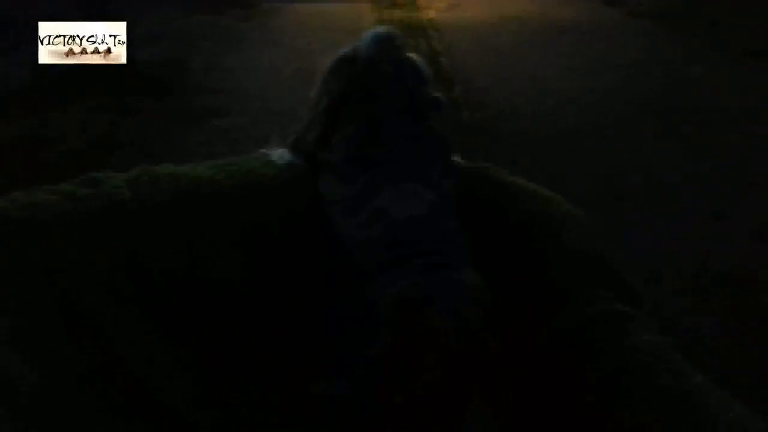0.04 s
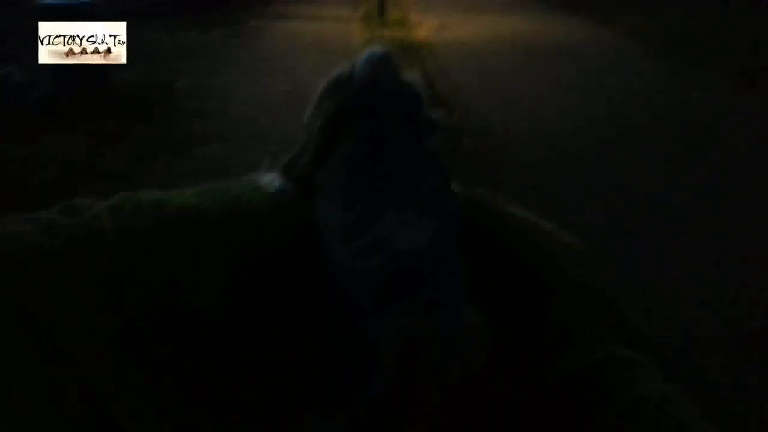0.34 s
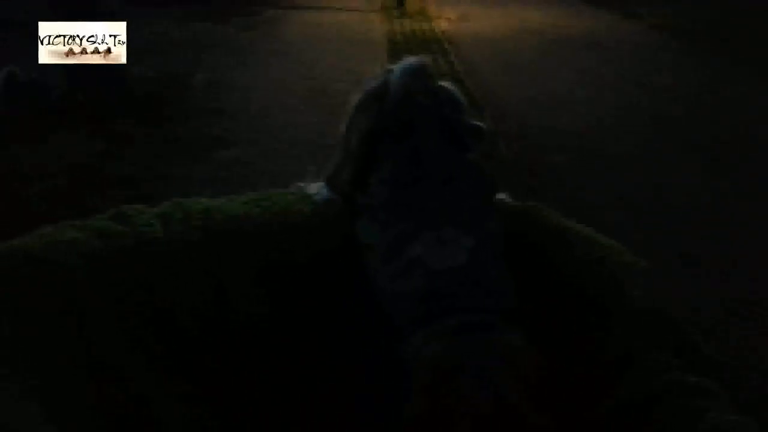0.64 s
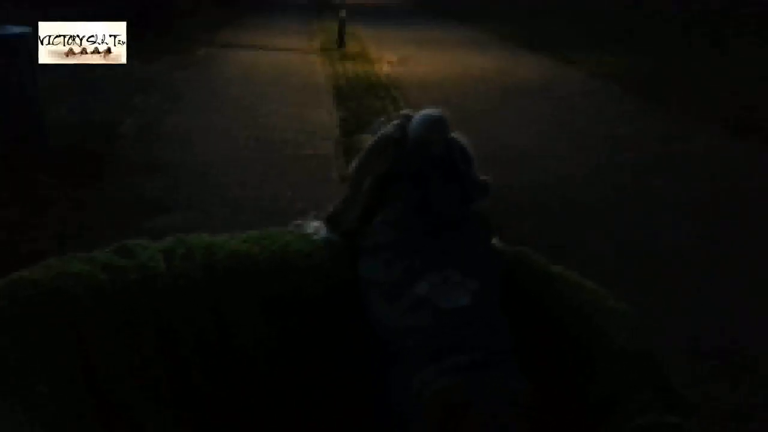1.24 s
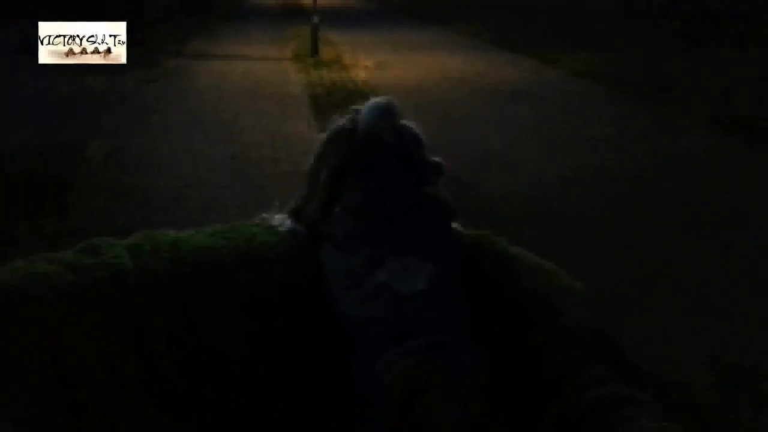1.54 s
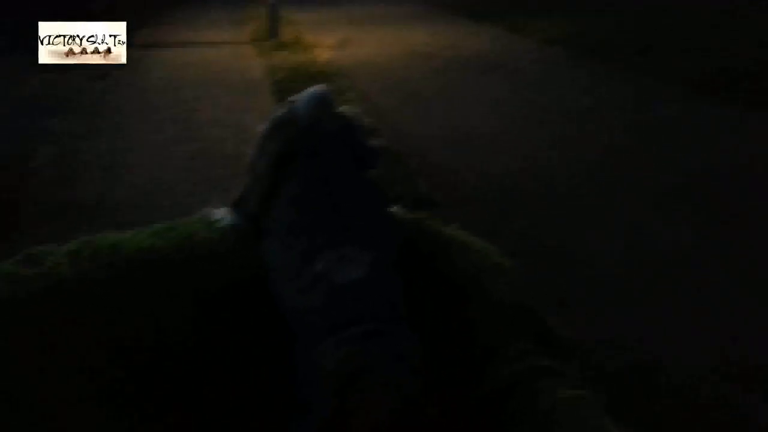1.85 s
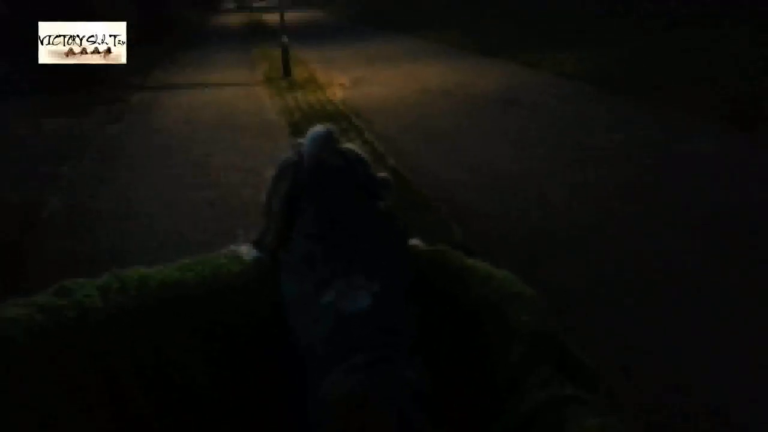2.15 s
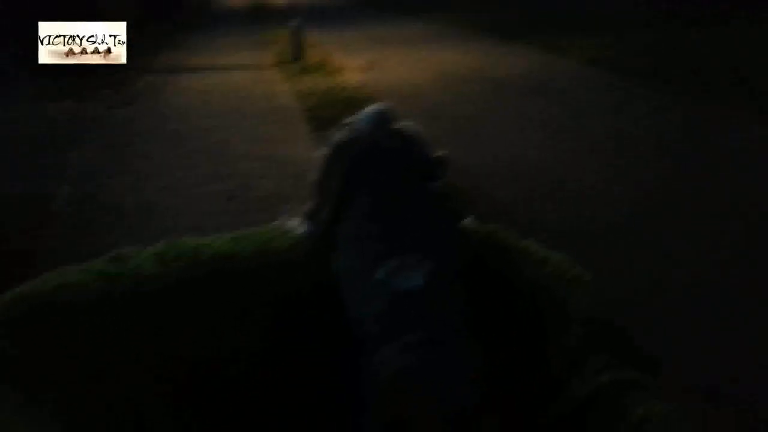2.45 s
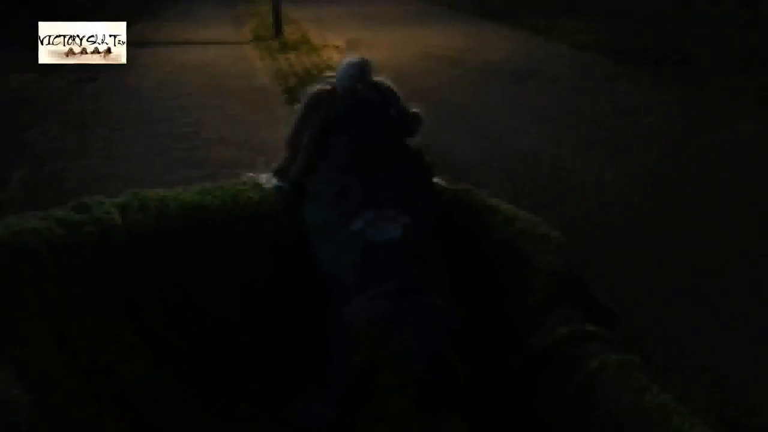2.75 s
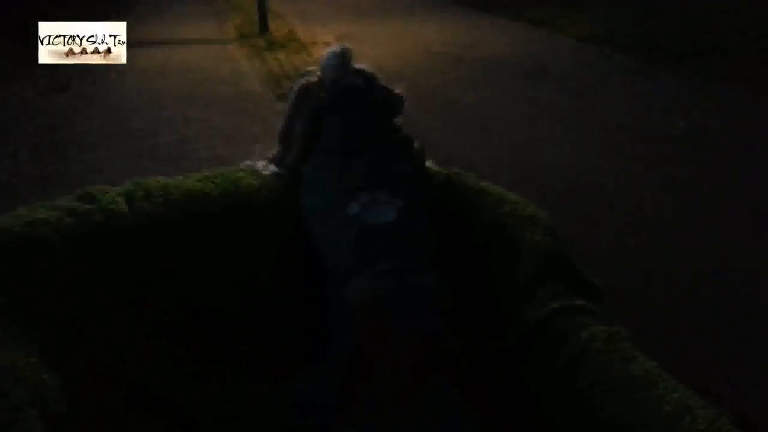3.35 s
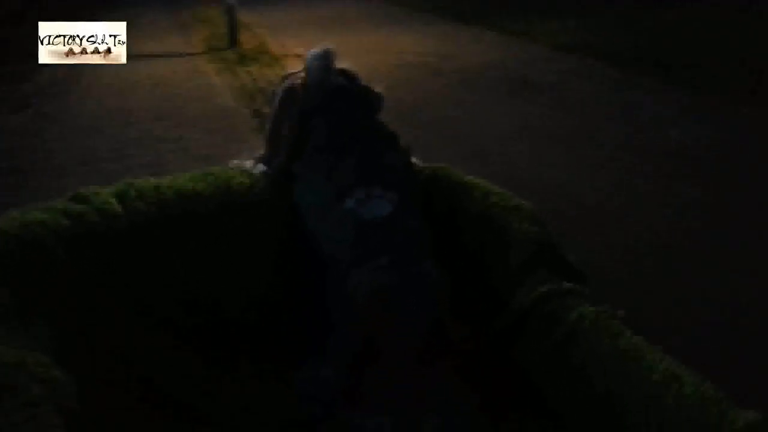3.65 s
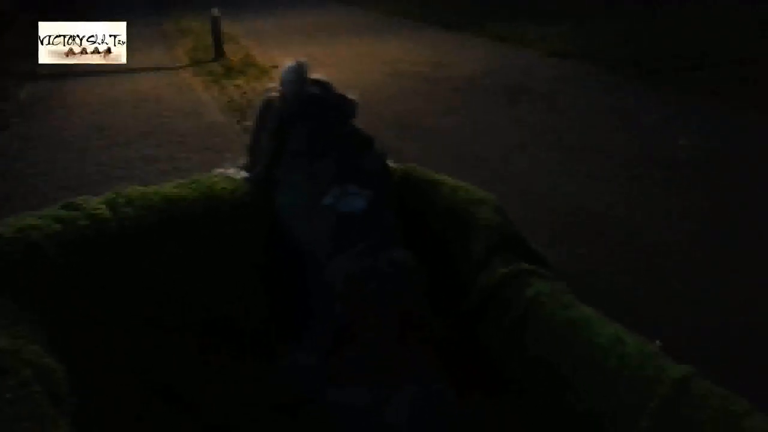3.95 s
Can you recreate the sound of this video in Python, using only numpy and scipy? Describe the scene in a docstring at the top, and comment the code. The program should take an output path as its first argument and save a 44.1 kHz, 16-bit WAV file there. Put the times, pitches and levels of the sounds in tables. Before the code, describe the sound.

A pram wheel chatters unevenly as the tyres rumble over a gritty paved path.

```python
"""A paved path at night, heard from the handle of a pram being pushed along it.
A wheel on the left catches and slips: quick, uneven resonant ticks that swell and stall, with short
reflections from hood, frame and ground. The tyres rumble, hiss over grit and scuff once; grit snaps.
Bumps thump through the chassis and clack its joints; two lone wheel ticks and one frame tap sound dry.
Brushing fabric swishes, its crisp top slightly to the right."""
import sys
import numpy as np
from scipy import signal
from scipy.fft import rfft, irfft, next_fast_len
from scipy.io import wavfile
from scipy.ndimage import map_coordinates

SR = 44100
rng = np.random.default_rng(int(sys.argv[2]) if len(sys.argv) > 2 else 0)


def dump(signal):
    """Clip the signal to [-1, 1] and save it as 16-bit WAV at the path in sys.argv[1]."""
    limited = np.clip(np.atleast_2d(signal).T, -1, 1)
    pcm = np.round(limited * 32767).astype(np.int16)
    wavfile.write(sys.argv[1], SR, pcm)


N = 176400

# tyres on the path: time_s, relative_db
RUMBLE_DB = [(0.0, -52.5), (0.23, -53.5), (0.49, -54.5), (0.72, -52), (1.34, -52.5), (1.69, -52.5),
             (1.95, -53), (2.17, -54.5), (2.41, -50), (2.61, -53), (2.82, -53), (2.95, -52), (3.6, -53),
             (4.0, -51.5)]
GRIT_DB = [(0.0, -51), (0.01, -42), (0.27, -42.5), (0.33, -38.5), (0.7, -44), (1.46, -43), (1.77, -38),
           (1.89, -46), (2.24, -37), (2.7, -41.5), (2.99, -39), (3.03, -43), (3.12, -40.5), (3.2, -44),
           (3.31, -41), (4.0, -40.5)]
# fabric swish and its crisp top: time_s, relative_db
SWISH_DB = [(0, -55), (.08, -53), (.17, -60.5), (.36, -50.5), (.5, -49.5), (.58, -58.5), (.66, -47.5),
            (.76, -61.5), (1.25, -57.5), (1.45, -55), (1.56, -59.5), (1.8, -56.5), (1.92, -60.5),
            (2.2, -64.5), (2.37, -57.5), (2.6, -59), (2.75, -51.5), (2.9, -60), (3.0, -58), (3.2, -57.5),
            (3.33, -49.5), (3.52, -65), (3.65, -59.5), (3.78, -60.5), (3.94, -51), (4, -50)]
FIZZ_DB = [(0.0, -56.5), (0.15, -63.5), (0.38, -52.5), (0.56, -66), (0.66, -60), (0.76, -62), (2.57, -60),
           (2.62, -65), (2.74, -54.5), (2.92, -63), (2.99, -55.5), (3.14, -62), (3.33, -53.5),
           (3.46, -60.5), (3.83, -60.5), (4.0, -53)]
# spectral shapes: freq_hz, gain_db
RUMBLE_EQ = [(20, -10), (42, -9), (75, -8), (115, -1), (165, 1), (280, 2), (480, 0.5), (750, 0), (1200, 0),
             (3000, -59)]
GRIT_EQ = [(60, -26), (200, -6), (650, -6), (950, -0.5), (1270, 5), (1600, -1), (2800, -1), (4200, -4),
           (6000, -13), (15000, -50)]
SCUFF_EQ = [(80, -41), (400, -4), (700, 4), (1100, -4), (2500, -7), (8000, -35)]
SWISH_EQ = [(200, -38), (1000, 14), (3000, 9.5), (5000, 9), (7500, 5.5), (9000, -2), (14500, -9.5)]
FIZZ_EQ = [(5000, -23), (8500, 11.5), (10500, 11.5), (14000, 10), (15000, -14)]
CHASSIS_EQ = [(30, -28), (80, -5), (150, -1.5), (1000, -1), (3000, 6), (6000, -10)]

# grit under a tyre: start_s, relative_db
GRIT_SNAPS = [(.188, -45), (0.65, -42), (.671, -45), (.935, -41), (0.95, -45), (1.634, -46), (2.294, -44),
              (2.929, -47), (3.603, -43), (3.661, -43.5)]
# thumps, before CHASSIS_EQ: start_s, level_db, t60_s, centre_hz
CHASSIS_BUMPS = [(0.476, -34, 0.055, 232), (0.526, -42, 0.14, 260), (0.613, -35, 0.12, 245),
                 (0.656, -39, 0.069, 215), (0.71, -42.5, 0.11, 190), (.74, -33, 0.072, 330),
                 (0.943, -45.5, 0.38, 210.4), (1.03, -42.5, 0.13, 188), (1.298, -33.5, 0.064, 320.2),
                 (1.395, -44, 0.26, 307), (1.75, -40.5, 0.098, 350.5), (1.845, -36, 0.09, 212),
                 (2.335, -40, 0.19, 400), (2.385, -38.5, 0.11, 267), (2.468, -39, 0.24, 252.2)]
# joint impacts: start_s, relative_db, t60_s, centre_hz, crack_db
JOINT_CLACKS = [(0.475, -28, 0.02, 3180, -34), (0.486, -28, 0.019, 3150, -35),
                (.521, -31, 0.0092, 3400, -22), (0.5276, -22.5, 0.013, 3260, -26),
                (0.572, -27.5, 0.023, 3340, -22), (0.6062, -24, 0.087, 3245, -16.5),
                (0.738, -34.5, 0.045, 3160, -44), (1.299, -32.5, 0.039, 3330, -42)]
# joint resonances: ratio_to_centre, gain_db
JOINT_MODES = [(.99, -5), (1.071, 5.5)]
# two wheel ticks, then a frame tap, before panning: time_s, low_hz, low_peak_db, high_hz, high_peak_db
SINGLE_TICKS = [(.704, 2400, -30, 4050, -26.5), (.785, 2330, -31, 3900, -42),
                (2.2282, 944, -25, 4407, -23.5)]
# their bandwidths: low_width_hz, high_width_hz
SINGLE_WIDTHS_HZ = (390, 1000)

# wheel slip rate: time_s, ticks_per_s
TICK_RATE_HZ = [(0, 113), (.17, 134), (.22, 82), (.34, 123), (.45, 115), (.52, 85), (.65, 110), (.72, 62),
                (.82, 121), (.88, 121), (1.12, 131), (1.19, 91), (1.3, 139), (1.5, 122), (1.66, 138),
                (1.84, 102), (2.0, 153), (2.15, 111), (2.34, 102), (2.42, 132), (2.56, 110), (2.75, 145),
                (2.92, 106), (2.99, 76), (3.1, 137), (3.2, 94.4), (3.35, 117), (3.6, 123), (3.73, 103),
                (4, 132)]
# chatter strength: time_s, relative_db
CHATTER_DB = [(0, -48.5), (.18, -47), (.205, -53.5), (.27, -47.5), (.36, -46), (.5, -40.5), (.59, -41),
              (.66, -42), (.71, -45), (.785, -50), (.81, -40.5), (.865, -39.5), (.935, -42), (.95, -53),
              (.995, -54), (1.025, -40.5), (1.1, -41), (1.16, -37.5), (1.29, -39.5), (1.33, -44.5),
              (1.41, -42), (1.47, -48), (1.57, -45.5), (1.8, -44), (1.855, -43), (1.88, -58), (1.92, -50.5),
              (1.96, -40.5), (2.01, -41), (2.06, -48.5), (2.13, -49), (2.23, -43), (2.26, -38.5),
              (2.35, -44), (2.42, -40.5), (2.475, -44), (2.52, -39), (2.665, -37.5), (2.74, -42.5),
              (2.83, -42), (2.95, -43.5), (3.01, -47), (3.05, -61), (3.08, -41.5), (3.11, -42), (3.17, -46),
              (3.2, -54), (3.26, -46), (3.36, -46), (3.42, -48.5), (3.5, -44), (3.64, -44.5), (3.71, -47),
              (3.82, -44.5), (4, -43)]
# weaker slips between ticks: time_s, db_re_ticks
STRAY_SLIP_DB = [(0, -4), (.35, -12), (.6, -18), (1.22, -19), (1.4, -8), (2.3, -8), (2.55, -17),
                 (2.68, -16), (2.8, -9), (3.35, -5), (4, -12)]
# tick resonances: time_s, centre_hz
MAIN_RING_HZ = [(0, 2280), (.45, 2560), (.75, 2300), (1.05, 2600), (1.12, 2900), (1.28, 2500), (1.38, 2180),
                (1.95, 2320), (2.5, 2780), (2.66, 2450), (2.85, 2300), (2.95, 2550), (3.1, 2480),
                (3.45, 2950), (4, 3150)]
HIGH_RING_HZ = [(0, 3920), (.5, 4260), (.88, 4100), (1.22, 4430), (1.45, 3830), (3.55, 3908), (4, 4462)]
# main resonance bandwidth: time_s, width_hz
MAIN_WIDTH_HZ = [(.8, 800), (1.08, 1100), (1.27, 680), (2.47, 850), (2.65, 740), (2.8, 900), (3.2, 850),
                 (3.5, 580), (4, 680)]
# secondary tick resonances: time_s, db_re_main
LOW_RING_DB = [(0, -9.5), (.9, -17), (1.3, -17), (1.6, -6), (1.9, -10.5), (2.1, -6.5), (2.64, -14),
               (2.92, -3.5), (3.3, -11), (3.62, -4), (4, -11.5)]
MID_RING_DB = [(3.1, -30), (3.33, -4), (3.48, -9), (3.77, -2.5)]
HIGH_RING_DB = [(0, 0), (.15, -2.5), (.27, 3.5), (.55, -5), (.78, -5), (.87, -1), (.94, 0.5), (1.1, -7),
                (1.24, -10), (1.5, 4), (1.65, 0), (1.92, -6.5), (2.17, -3.5), (2.42, -12.5), (2.62, -8.5),
                (2.9, -5), (3.13, -0.5), (3.5, -5.5), (4, -7)]


def amp(db):
    """Decibels to gain."""
    return 10 ** (np.asarray(db) / 20)


def ears(left_db, right_db):
    """Stereo gain column."""
    return amp([[left_db], [right_db]])


def unit(x):
    """Scale to rms 1."""
    return x / np.sqrt(np.mean(x ** 2) + 1e-20)


def curve(rows):
    """(time_s, value) rows to one value per sample."""
    return np.interp(np.arange(N) / SR, *np.transpose(rows))


def flicker(depth_db, rate_hz):
    """Smooth random gain around 0 dB."""
    knots = rng.standard_normal(2000)
    return amp(depth_db * map_coordinates(knots, [np.arange(N) * rate_hz / SR], mode="wrap"))


def filtered(x, response):
    """Apply a frequency response."""
    size = next_fast_len(x.shape[-1] + 8192)
    return irfft(rfft(x, size) * response(np.fft.rfftfreq(size, 1 / SR)), size)[..., :x.shape[-1]]


def equalised(x, eq):
    """Apply (freq_hz, gain_db) points on a log axis."""
    freq_hz, gain_db = np.transpose(eq)
    return filtered(x, lambda hz: amp(np.interp(np.log(hz + 1), np.log(freq_hz), gain_db)))


def stereo_noise(side_db, size=N):
    """White noise: a shared part plus an opposed part."""
    mid, side = rng.standard_normal((2, size))
    return unit(mid + amp(side_db) * np.array([side, -side]))


def add(out, start_s, x):
    """Mix x in at start_s."""
    part = out[..., max(0, round(start_s * SR)):][..., :x.shape[-1]]
    part += x[..., :part.shape[-1]]


def burst(centre_hz, t60_s, width_oct, rise_s, side_db, skirt_db):
    """A blow into a cluster of damped resonances, as decaying band noise."""
    def band(hz):
        bell = np.exp(-(np.log2((hz + 1) / centre_hz) / width_oct) ** 2 / 2)
        return bell + amp(skirt_db) / (1 + (hz / (2 * centre_hz)) ** 2)

    t = np.arange(SR // 3) / SR
    envelope = amp(-60 * t / t60_s) * (1 - np.exp(-t / rise_s))
    noise = stereo_noise(side_db, len(t)) * envelope
    return unit(filtered(noise, band)) * np.sqrt(np.mean(envelope ** 2))


def packet(t, hz, width_hz):
    """A few cycles around t = 0; a wider resonance gives a shorter tick."""
    return np.exp(-(np.pi * width_hz * t) ** 2 / np.log(4)) * np.cos(2 * np.pi * hz * t)


def tyres():
    """Tyres roll on paving: low rumble, finer crunch of grit, one scuff."""
    rumble = stereo_noise(side_db=-9.5) * flicker(depth_db=0.71, rate_hz=45)
    rumble = unit(equalised(rumble, RUMBLE_EQ)) * amp(curve(RUMBLE_DB) + 1.5)
    grit = stereo_noise(side_db=-0.5) * flicker(depth_db=3.9, rate_hz=400)
    grit = unit(equalised(grit, GRIT_EQ)) * amp(curve(GRIT_DB) - 2)
    scuff_peak_s, scuff_half_s, scuff_db = 0.38, 0.11, -43
    swell = np.exp(-((np.arange(N) / SR - scuff_peak_s) / scuff_half_s) ** 2)
    scuff = unit(equalised(stereo_noise(side_db=-13), SCUFF_EQ)) * swell * amp(scuff_db)
    return rumble * ears(-0.8, 0.8) + grit + scuff


def fabric():
    """Cloth brushes with the walk; its fibres add a crisp top."""
    swish = stereo_noise(side_db=-4.5) * flicker(depth_db=2.06, rate_hz=490)
    swish = unit(equalised(swish, SWISH_EQ)) * amp(curve(SWISH_DB) + 6.5)
    fizz = stereo_noise(side_db=-1.5) * flicker(depth_db=0.74, rate_hz=460)
    fizz = unit(equalised(fizz, FIZZ_EQ)) * amp(curve(FIZZ_DB) + 2.5)
    return swish * ears(-0.5, 0.5) + fizz * ears(-1.3, 1.3)


def grit_snaps():
    """Grit snaps under a tyre, right of centre."""
    out = np.zeros((2, N))
    for start_s, level_db in GRIT_SNAPS:
        snap = burst(centre_hz=7000, t60_s=0.038, width_oct=0.97, rise_s=0.00034,
                     side_db=-2, skirt_db=-21)
        add(out, start_s, amp(level_db) * snap)
    return out * ears(-2.5, 2.5)


def chassis_bumps():
    """Bumps excite the low resonances of the chassis."""
    out = np.zeros((2, N))
    for start_s, level_db, t60_s, centre_hz in CHASSIS_BUMPS:
        thump = burst(centre_hz, t60_s, width_oct=1, rise_s=0.0031, side_db=-14, skirt_db=-16)
        add(out, start_s, amp(level_db) * thump)
    return equalised(out, CHASSIS_EQ)


def joint_clacks():
    """A joint cracks on first hard contact, then rings and rattles."""
    crack_hz, crack_rise_s = 4200, 0.00013
    out, t = np.zeros((2, N)), np.arange(SR // 3) / SR
    crack = t / crack_rise_s * np.exp(1 - t / crack_rise_s) * np.sin(2 * np.pi * crack_hz * t)
    for start_s, level_db, t60_s, centre_hz, crack_db in JOINT_CLACKS:
        ring = sum(amp(gain_db - 60 * t / t60_s) * np.sin(2 * np.pi * centre_hz * ratio * t)
                   for ratio, gain_db in JOINT_MODES)
        rattle = burst(centre_hz, t60_s, width_oct=0.3, rise_s=0.0001, side_db=-3.5, skirt_db=-15)
        add(out, start_s, amp(level_db - 9) * ring + amp(level_db - 1.5) * rattle + amp(crack_db) * crack)
    return out * ears(1.5, -1.5)


def single_ticks():
    """Two lone wheel ticks and one light frame tap: dry, on the left, two resonances each."""
    low_width_hz, high_width_hz = SINGLE_WIDTHS_HZ
    out, t = np.zeros(N), np.arange(N) / SR
    for time_s, low_hz, low_db, high_hz, high_db in SINGLE_TICKS:
        out += amp(low_db) * packet(t - time_s, low_hz, low_width_hz)
        out += amp(high_db) * packet(t - time_s, high_hz, high_width_hz)
    return out * ears(2, -2)


def reflections(x, t60_s=0.052):
    """Echoes off hood, frame and ground; crossfaded random tails shift them as the pram moves."""
    out, t = np.zeros((2, N)), np.arange(SR // 8) / SR
    centres, spacing = np.linspace(0, N, num=24, retstep=True)
    for centre in centres:
        tail = rng.standard_normal((2, len(t))) * amp(-60 * t / t60_s)
        tail /= np.linalg.norm(tail[0])
        fade = np.sqrt(np.clip(1 - abs(np.arange(N) - centre) / spacing, 0, 1))
        live = np.flatnonzero(fade)
        add(out, live[0] / SR, signal.fftconvolve((x * fade)[None, live], tail, axes=1))
    return out


def wheel_slips(jitter_cycles=0.075, spread_db=1.3, stray_jitter_cycles=0.3, stray_spread_db=5):
    """Sample indices and gains of the slips: one per cycle, plus a weaker stray in between."""
    phase_cycles = np.cumsum(curve(TICK_RATE_HZ)) / SR
    cycles = np.arange(int(phase_cycles[-1]))
    late, size, stray_late, stray_size = rng.standard_normal((2000, 4))[cycles].T
    slip_cycles = np.r_[cycles + jitter_cycles * late, cycles + 0.5 + stray_jitter_cycles * stray_late]
    at = np.interp(slip_cycles, phase_cycles, np.arange(N)).astype(int)
    tick_db = spread_db * np.clip(size, -2, 1)
    stray_db = curve(STRAY_SLIP_DB)[at[len(cycles):]] + stray_spread_db * np.clip(stray_size, -2, 1)
    return at, amp(np.r_[tick_db, stray_db])


def wheel_resonance(at, gains, centre_hz, width_hz, pitch_spread=0.045):
    """Each slip rings one heavily damped resonance at a slightly random pitch."""
    lags = np.arange(-SR // 200, SR // 200)
    centre_hz, width_hz = (np.broadcast_to(v, N)[at, None] for v in (centre_hz, width_hz))
    pitch_hz = centre_hz * np.exp(pitch_spread * rng.standard_normal((4000, 1))[:len(at)])
    ticks = gains[:, None] * np.sqrt(width_hz) * packet(lags / SR, pitch_hz, width_hz)
    samples = abs(at[:, None] + lags)
    return unit(np.bincount(samples.ravel(), ticks.ravel(), N)[:N])  # overlap-add


def wheel_chatter(lag_s_per_hz=2e-7):
    """The wheel catches and slips about 120 times a second, ringing four resonances."""
    at, gains = wheel_slips()
    ring = wheel_resonance(at, gains, curve(MAIN_RING_HZ), curve(MAIN_WIDTH_HZ))
    ring += amp(curve(LOW_RING_DB)) * wheel_resonance(at, gains, centre_hz=1240, width_hz=340)
    ring += amp(curve(MID_RING_DB)) * wheel_resonance(at, gains, centre_hz=1979, width_hz=560)
    ring += amp(curve(HIGH_RING_DB)) * wheel_resonance(at, gains, curve(HIGH_RING_HZ), width_hz=1080)
    # treble lags bass: each tick chirps upward
    chirped = filtered(ring, lambda hz: np.exp(-1j * np.pi * lag_s_per_hz * hz ** 2))
    return chirped * amp(curve(CHATTER_DB))


def scene():
    """Chattering wheel on the left, the rest all around."""
    chatter = wheel_chatter()
    wheel = chatter * ears(3.5, -13) + reflections(chatter) * ears(-4.5, -7)
    return wheel + tyres() + fabric() + chassis_bumps() + joint_clacks() + grit_snaps() + single_ticks()


def record(dry):
    """First-order low cut and a hard treble limit."""
    low_cut_hz, top_hz = 62, 15000
    return filtered(dry, lambda hz: (hz < top_hz) * hz / np.hypot(hz, low_cut_hz))


dry = scene()
out = record(dry)
dump(out)
```